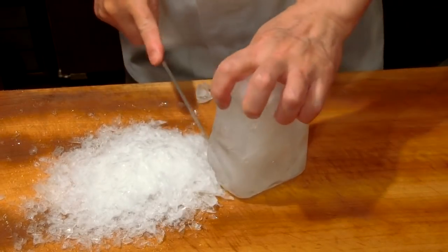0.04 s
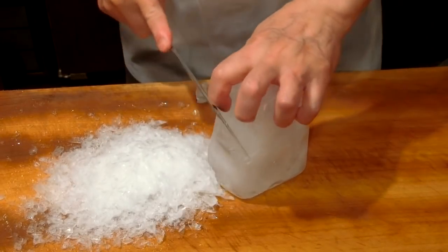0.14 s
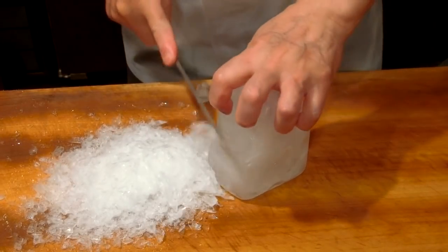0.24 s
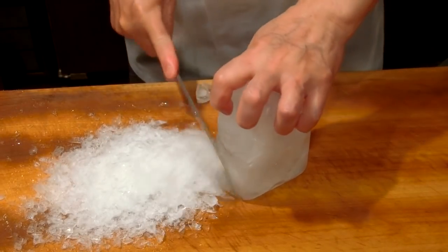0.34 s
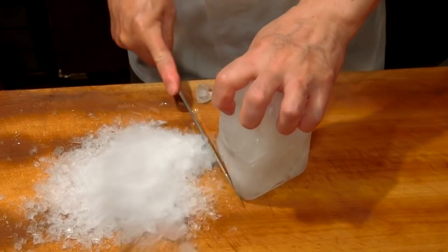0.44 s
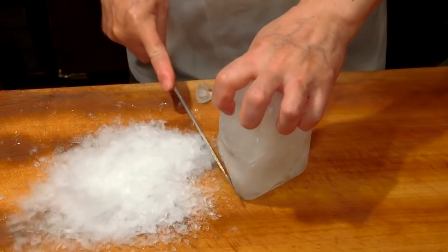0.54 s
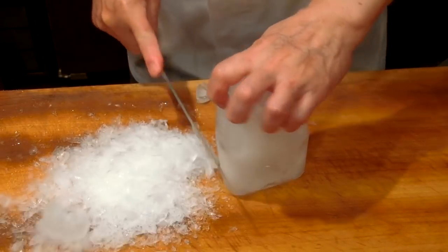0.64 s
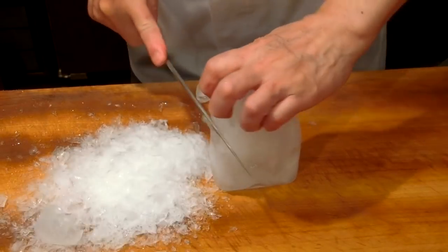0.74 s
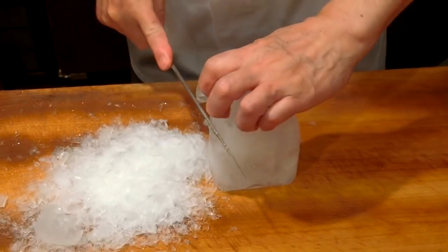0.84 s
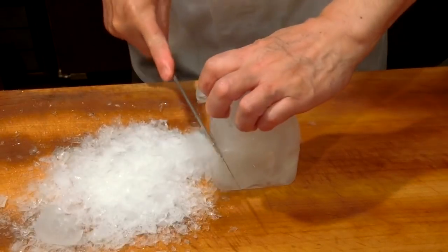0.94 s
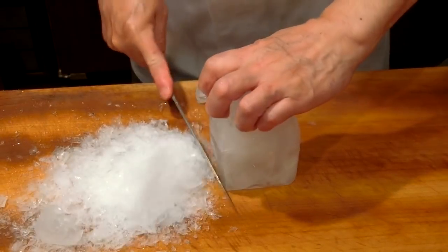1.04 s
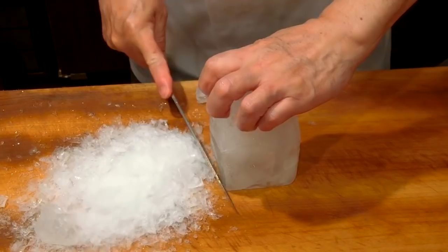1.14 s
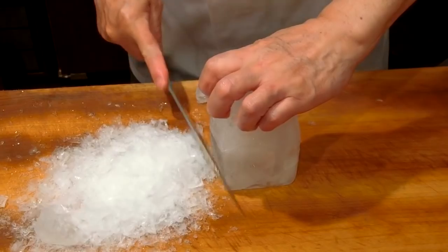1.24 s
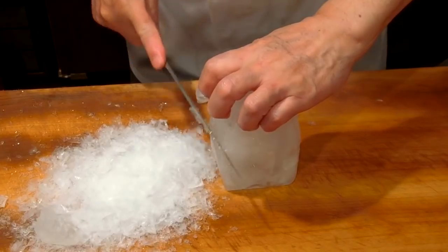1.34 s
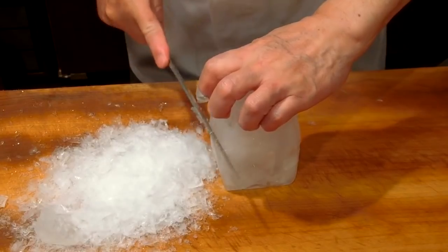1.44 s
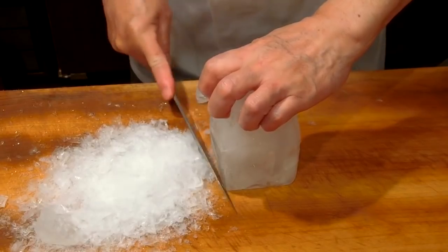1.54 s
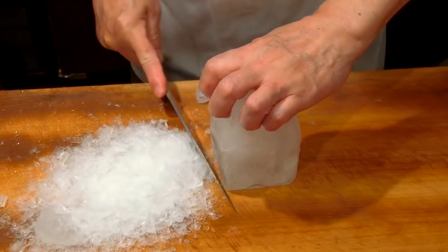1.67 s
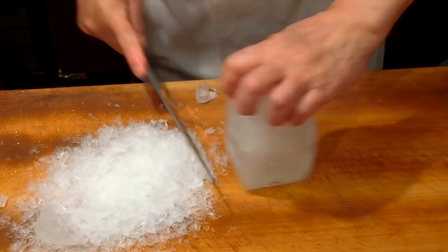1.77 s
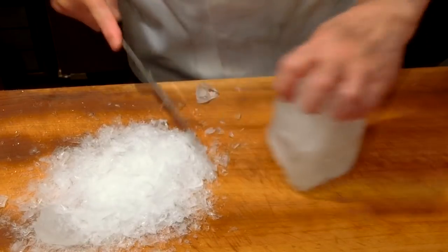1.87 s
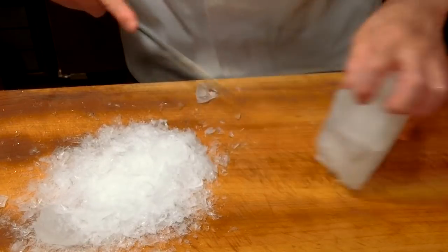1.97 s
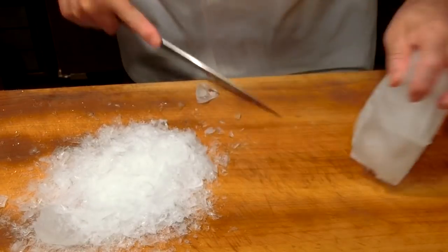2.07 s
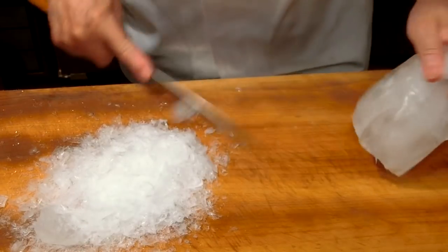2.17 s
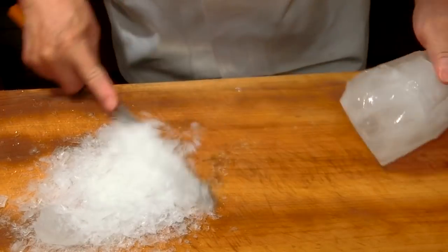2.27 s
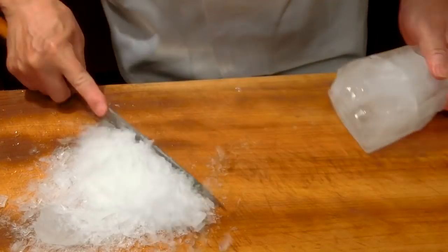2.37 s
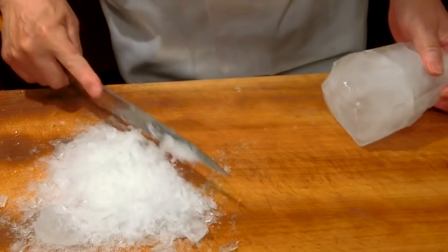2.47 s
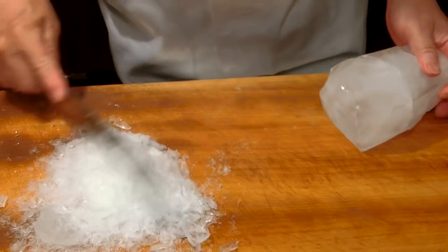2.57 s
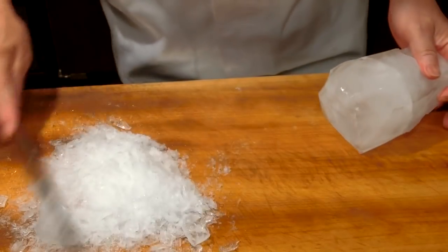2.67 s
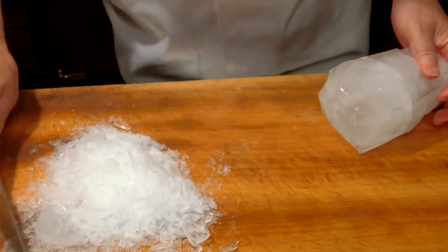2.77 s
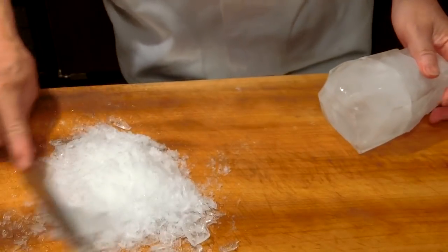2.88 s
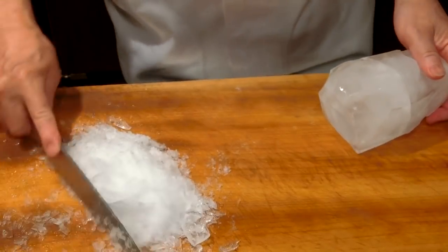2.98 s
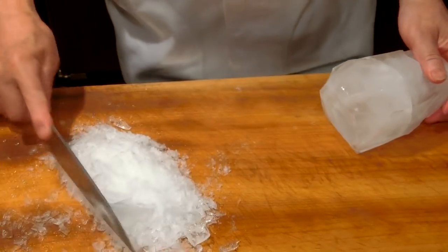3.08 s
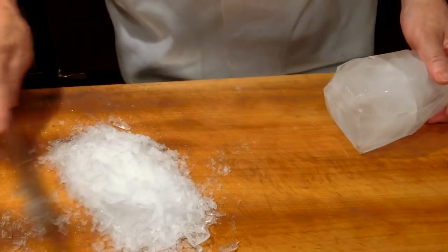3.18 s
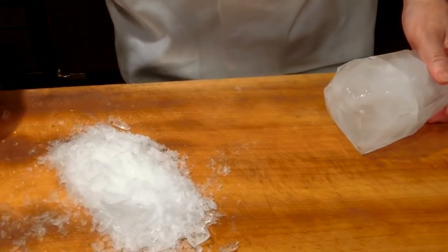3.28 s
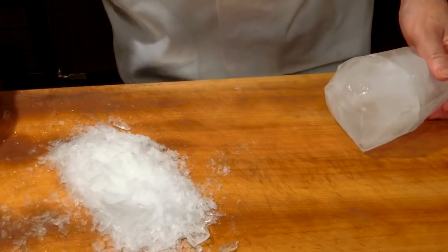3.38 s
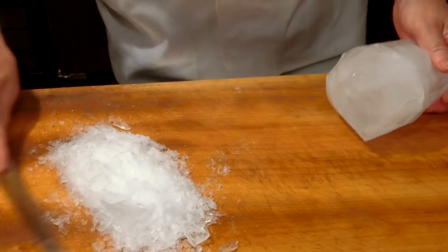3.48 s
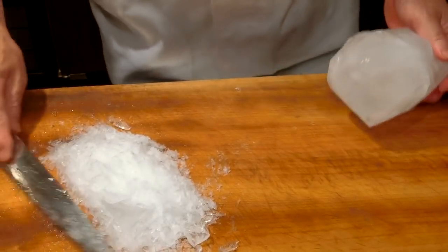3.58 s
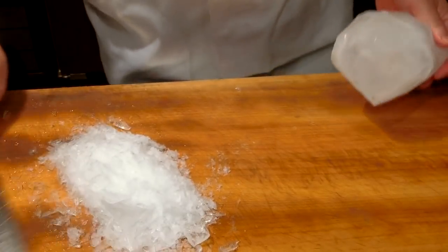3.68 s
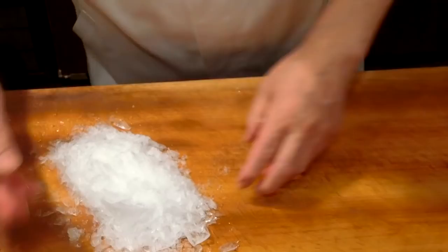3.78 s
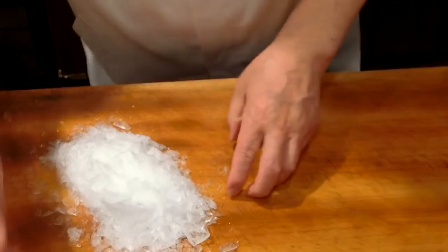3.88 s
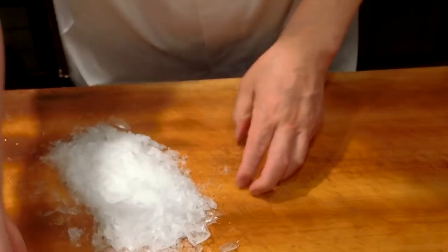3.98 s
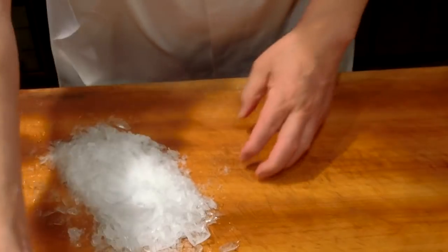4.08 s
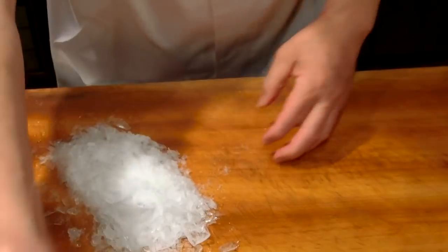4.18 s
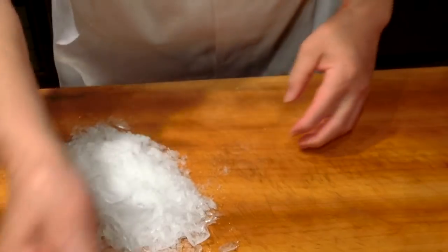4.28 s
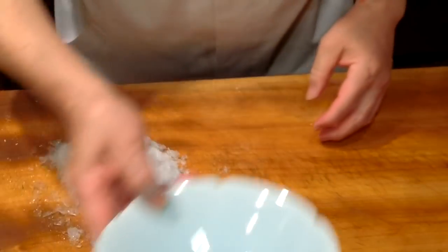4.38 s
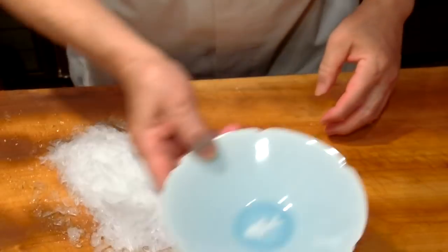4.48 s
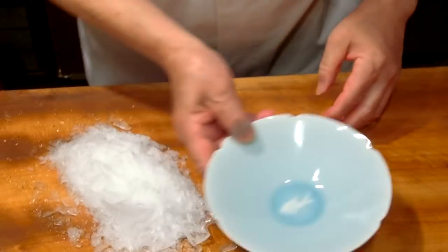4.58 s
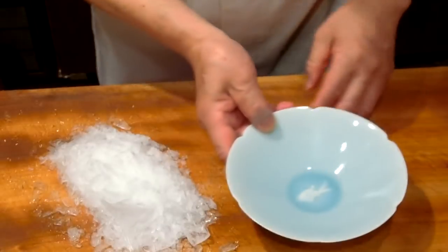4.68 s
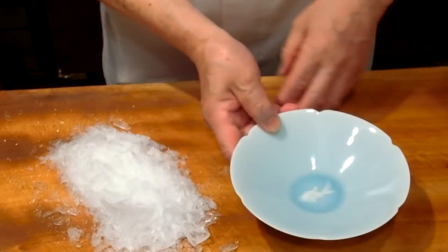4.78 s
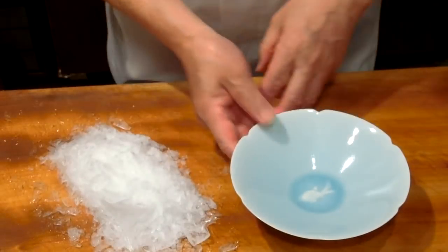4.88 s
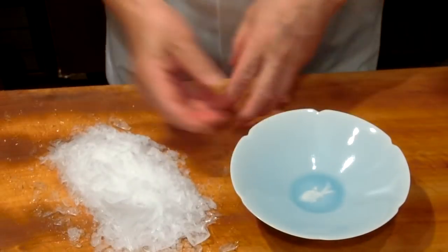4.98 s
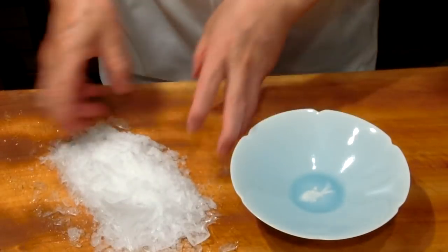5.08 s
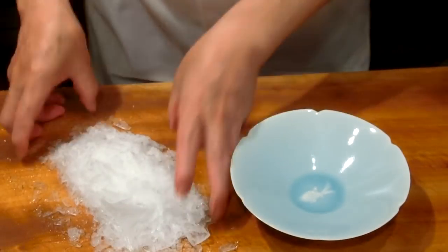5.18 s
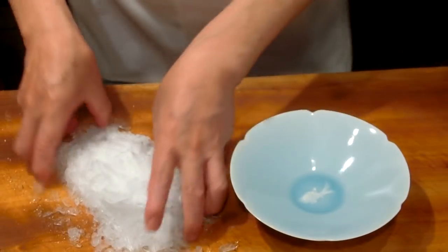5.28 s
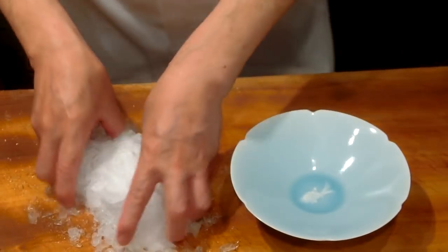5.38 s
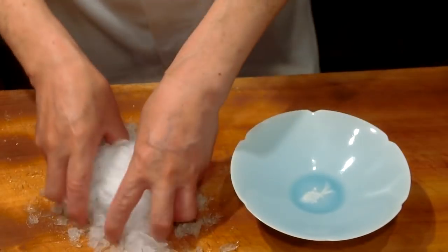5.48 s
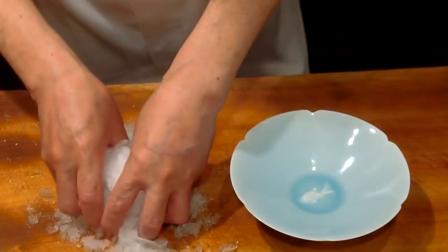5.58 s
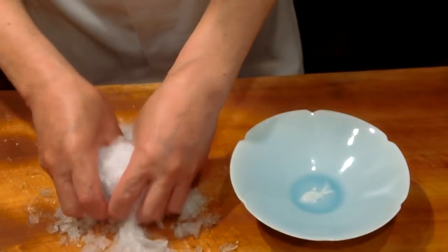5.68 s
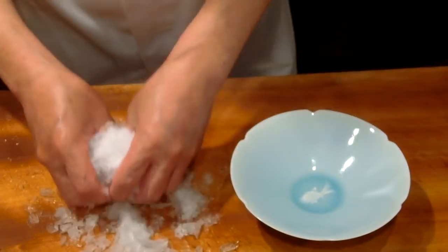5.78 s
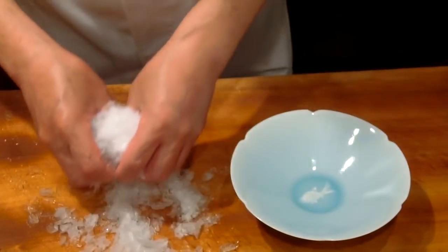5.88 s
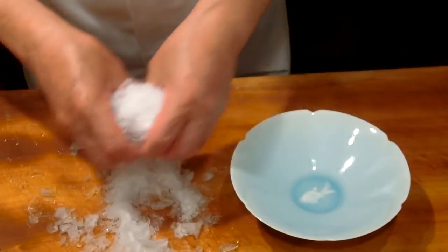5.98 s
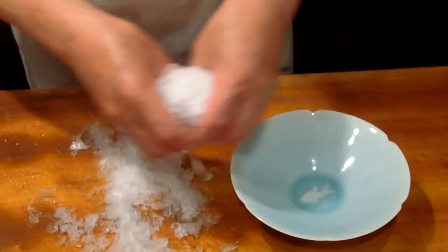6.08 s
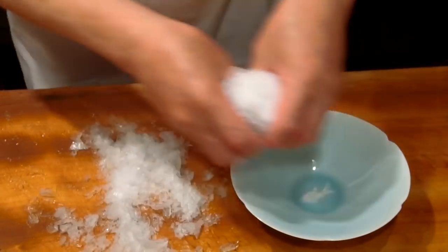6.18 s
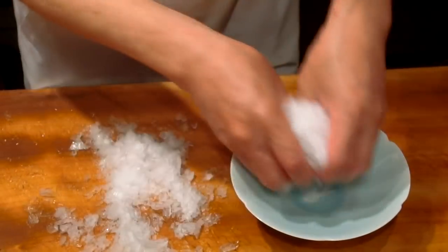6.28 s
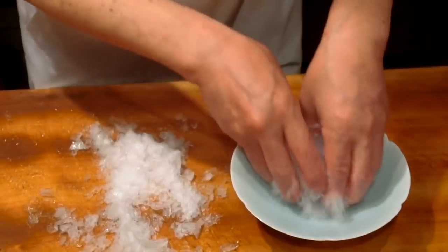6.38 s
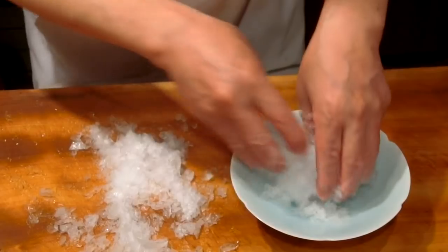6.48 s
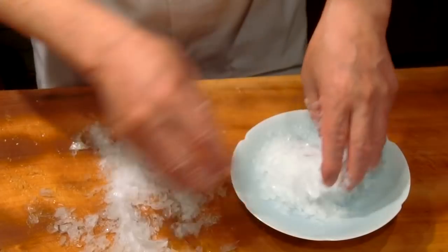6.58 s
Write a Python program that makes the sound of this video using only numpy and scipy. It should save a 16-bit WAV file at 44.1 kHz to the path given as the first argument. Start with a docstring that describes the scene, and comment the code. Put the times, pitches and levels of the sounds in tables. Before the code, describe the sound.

Three quick crunches of shaved ice, crisp and high, stop against a thick wooden board. The steel edge then clicks and rasps as it pushes loose flakes into a heap. Skin brushes quietly, a dish is set down with a strong wooden thud and slight porcelain tick, and loose ice is gathered with soft, slushy rustling, ending in a small ringing clink. Heard close in a small room, with low steady fan air underneath.

```python
"""In a small kitchen, heard from close by, a long knife shaves a block of ice in three quick strokes,
each ending on a thick wooden board. The block is put aside, the blade sweeps the shavings into a heap,
a porcelain dish is set down, and two hands scoop up the ice and drop it in while a fan hums.
Ice is built from showers of tiny random clicks; steel, wood and porcelain from fading tones;
the fan from coloured noise and a few wavering tones."""
import sys
import numpy as np
from scipy import signal
from scipy.fft import rfft, irfft
from scipy.io import wavfile
from scipy.ndimage import uniform_filter1d

SR = 44100
rng = np.random.default_rng(int(sys.argv[2]) if len(sys.argv) > 2 else 0)


def to_wav(s):
    """Save 16-bit WAV."""
    ch = np.atleast_2d(s).T  # columns
    pcm = np.round(np.clip(ch, -1, 1) * 32767)  # PCM
    wavfile.write(sys.argv[1], SR, pcm.astype(np.int16))


N = 292381
TIME = np.arange(N) / SR
RING_TIME = TIME[:SR // 2]  # half a second, for blows and responses

# crisp sound of ice being cut: (frequency [Hz], level [dB])
CUT_COLOUR = [(2060, -22), (3500, -10.5), (5360, -4), (5530, -7.5), (6440, -4.5), (6780, -8.5), (7320, -7),
              (9440, -8.5), (10300, -6), (11100, -4.5), (13600, 3), (15100, 1), (16000, -32.5)]
# wetter crunch of loose shavings: (frequency [Hz], level [dB])
SLUSH_COLOUR = [(590, -14.5), (1000, -12.5), (1370, -11), (1450, -10), (1910, -10), (2180, -7.5),
                (2440, -6), (5310, -9), (7880, -11.5), (13900, -1), (15100, -4), (16000, -0.5)]


def shaving_strokes(cut_db=-1, body_db=-1, steel_db=-6, catch_db=1.5):
    """The edge catches and slips, breaking off flakes; block and blade sound too, most at the board."""
    # pushes of the edge down the block, force building until the ice gives way:
    # (time it gives [s], level [dB], build-up [s], body of block and blade relative to it [dB])
    push_table = [(0.229, -30, 0.059, -17.5), (0.254, -28.5, 0.079, -12.5), (.318, -21, 0.062, -10.5),
                  (0.354, -20, 0.067, -16), (0.932, -22.5, 0.094, -8), (0.971, -12.5, 0.017, -14.5),
                  (0.993, -19.5, 0.05, -11), (1.492, -26.5, 0.064, -11)]
    push_hold_s, push_release_s = 0.0058, 0.036
    # the edge crushing flakes against the board at the foot of a stroke: (time [s], level [dB])
    crush_table = [(0.359, -19.5), (1, -27.5), (1.5, -25)]
    crush_rise_s, crush_release_s = 0.013, 0.047
    # duller sound of the whole block: (frequency [Hz], level [dB])
    block_colour = [(60, -28), (110, -11), (200, -6.5), (350, 5.5), (650, -6), (1100, 0.5), (1600, -6.5),
                    (2800, 3), (3600, -2), (5500, -25)]

    fractures = flake_sizes(stick_slip(catch_db) * grains(per_s=3500, spread_db=2.0))
    pushes = [move(s, db, build_s, push_hold_s, push_release_s) for s, db, build_s, _ in push_table]
    crushes = [move(s, db, crush_rise_s, 0, crush_release_s) for s, db in crush_table]
    cutting = np.max(pushes, axis=0) * fractures
    out = undb(cut_db) * through(cutting, colour(CUT_COLOUR))

    body_pushes = [undb(row[-1]) * push for row, push in zip(push_table, pushes)]
    block = undb(body_db) * colour(block_colour)
    for force in body_pushes + crushes:
        body = undb(steel_db) * blade(hold=0.32, rub_db=-29)
        body[:len(block)] += block
        out = out + through(force * fractures, body)
    return out


def blade_sweeps(hiss_db=-1, steel_db=1, drag_db=-18, drag_hz=335, catch_db=0.5):
    """The edge rubs over wet wood, ringing steel and dragging the board; shavings hiss ahead of it."""
    # the blade pushing shavings over the board:
    # (time at full speed [s], ice hiss level [dB], steel ring level [dB], rise [s], hold [s], release [s])
    sweeps = [(2.161, -36.5, -32, .15, 0.035, 0.39), (2.825, -33.5, -39, 0.011, 0.088, 0.16),
              (3.337, -36, -33, 0.022, 0.14, 0.18), (3.771, -44, -44, 0.08, .078, 0.0054)]
    sag_db_per_s = 73  # shavings pile up on the blade and damp it

    catch, out = stick_slip(catch_db), 0
    flakes = flake_sizes(catch * grains(per_s=2500, spread_db=4.0))
    rub = flake_sizes(catch * grains(per_s=1400, spread_db=3.0))
    for s, ice_db, ring_db, rise_s, hold_s, release_s in sweeps:
        speed = move(s, 0, rise_s, hold_s, release_s)
        hiss = undb(hiss_db + ice_db) * through(speed * flakes, colour(SLUSH_COLOUR))
        ring_gain = undb(ring_db - sag_db_per_s * np.maximum(TIME - s, 0))
        steel = undb(steel_db) * blade(hold=0.59, rub_db=-2.5, place_db=3, shift=0.0128)
        dragged_board = undb(drag_db) * ring([(drag_hz, 0, .05)])
        out = out + hiss + through(speed * ring_gain * rub, steel + dragged_board)
    return out


def blade_taps(flat_hz=7000):
    """The blade lands on ice or wood and chatters briefly, which makes its steel ring."""
    # the blade meeting ice or wood:
    # (time [s], level [dB], chatter fade time, at least 0.0003 [s], treble lean [dB per octave])
    taps = [(0.032, -46, 0.045, 7.5), (0.096, -45.5, 0.025, 2), (0.767, -45.5, 0.0055, 0),
            (.812, -41.5, 0.03, 1.5), (1.222, -49, 0.012, 3), (1.28, -61, 0.0022, 9.5),
            (1.333, -46, 0.006, -0.5), (1.345, -33.5, 0.025, 4), (1.658, -45.5, 0.0063, 3.5),
            (1.671, -44, 0.0043, -5), (1.835, -57.5, .01, 12), (1.881, -46.5, 0.011, 5.5),
            (2.034, -35, 0.011, -5), (2.743, -31, 0.0065, -1), (2.827, -28, 0.0068, -1),
            (3.278, -45.5, .002, -2.5), (3.332, -23, 0.014, -3.5), (3.472, -30, 0.0085, 13),
            (3.72, -18, 0.005, 3), (3.777, -36, 0.0081, 10)]
    out = np.zeros(N)
    for s, db, seconds, lean in taps:
        # the lean stops at flat_hz
        hardness = colour([(125, 0), (flat_hz, lean * np.log2(flat_hz / 125))])
        steel = blade(hold=1.0, rub_db=1.5, place_db=7.5)
        chatter = through(burst(seconds, per_s=3000), steel)
        add(out, s, through(chatter, hardness), db)
    return out


def blade(hold, rub_db, place_db=3, shift=0.03):
    """Steel tones over the broad sound of contact; each new touching point reweights and bends them."""
    # tones of the knife blade: (frequency [Hz], level [dB], free time to fade by 60 dB [s])
    blade_modes = [(1356, 2, 0.028), (1630, 4, 0.072), (1795, -9, 0.12), (2120, -12, .07),
                   (2474, -4.5, 0.14), (2700, -19, 0.043), (2854, -14.5, 0.14), (3360, -1, 0.038),
                   (3426, 4.5, 0.07), (4070, 4, 0.08), (4750, 4.5, 0.039), (5480, -4.5, 0.1),
                   (6300, -16, .03), (7020, 3, 0.061), (7430, 0, 0.027), (8380, -0.5, 0.14),
                   (10390, 4, 0.033), (11900, -4, 0.14), (12150, 8.5, 0.014), (13400, 22, 0.014)]
    # steel rubbing: (frequency [Hz], level [dB])
    rub_colour = [(50, -42), (120, -17), (330, -3), (600, 7.5), (1000, 0.5), (1700, 3), (2600, 12.5),
                  (4000, 8.5), (7000, 2.5), (15000, 6.5)]
    chance = rng.standard_normal((len(blade_modes), 2))
    modes = [(hz * (1 + shift * bend), db + place_db * weight, t60)
             for (hz, db, t60), (bend, weight) in zip(blade_modes, chance)]
    response = ring(modes, hold)
    rub = colour(rub_colour)
    response[:len(rub)] += undb(rub_db) * rub
    return unit(response)


def ice_cracks():
    """Larger chips snap off and crumble into a dying run of smaller fractures."""
    # ice cracking or crunching: (time [s], level [dB], crumble fade time, at least 0.0003 [s])
    cracks = [(0.144, -46.5, .003), (0.254, -21, 0.0056), (.277, -26, 0.0046), (0.343, -19, 0.016),
              (.509, -38, 0.0037), (.575, -37.5, 0.0039), (0.647, -44, 0.0068), (.811, -38, 0.0022),
              (0.897, -30, 0.0035), (.925, -18, 0.014), (1.463, -34, 0.0072), (1.479, -21.5, 0.022),
              (2.182, -22.5, 0.0012), (2.744, -23, 0.0067), (2.902, -33, .01), (3.722, -21, 0.0051),
              (3.8, -27.5, .004), (3.82, -38.5, 0.0017), (4.102, -52, .003), (5.249, -38.5, .004),
              (5.307, -41, 0.0034), (5.92, -43.5, 0.002), (6.012, -42.5, 0.0012), (6.101, -42.5, 0.002),
              (6.347, -39.5, 0.0066), (6.365, -22, 0.005), (6.505, -37.5, 0.004)]
    out, ice = np.zeros(N), colour(SLUSH_COLOUR) + colour(CUT_COLOUR)
    for s, db, seconds in cracks:
        add(out, s, through(burst(seconds, per_s=4800), ice), db)
    return out


def ice_pops(t60=0.005, snap_db=-3):
    """Each air pocket opens with a snap and a very short, high ping."""
    # air pockets in the melting ice popping: (time [s], level [dB], pitch [Hz])
    pops = [(0.528, -33, 13300), (1.077, -37, 14300), (1.282, -49, 14100), (2.331, -41, 13700),
            (3.099, -46, 14300), (3.238, -48.5, 14100), (5.942, -49, 15100)]
    out = np.zeros(N)
    for s, db, hz in pops:
        ping = ring([(hz, 0, t60)])
        ping[0] += undb(snap_db) / 2
        add(out, s, ping, db)
    return out


def loose_ice(crunch_db=0, brush_db=0, slip_db=5.0):
    """Soft, uneven crunch of flakes sliding over each other, and the brush of wet hands."""
    # loose shavings settling after a stroke, or gathered by hand:
    # (time [s], level [dB], rise [s], hold [s], release [s])
    shavings = [(0.501, -42, .12, 0.084, 0.28), (1.116, -47.5, 0.074, 0.012, 0.17),
                (2.397, -47, 0.12, .01, 0.2), (3.002, -55, .1, .02, 0.22), (5.088, -55, 0.17, .14, .1),
                (5.306, -41, 0.15, 0.26, 0.19), (5.675, -42.5, .15, .02, 0.56),
                (5.94, -64.5, 0.18, 0.04, 0.25), (6.11, -58.5, 0.22, .02, 0.97),
                (6.38, -35.5, 0.11, .015, 0.23), (6.51, -46, .05, .01, 0.53)]
    # hands and sleeves brushing past: (time [s], level [dB], rise [s], hold [s], release [s])
    brushes = [(3.167, -67, 0.27, 0.049, 0.17), (3.628, -60, 0.34, 0.025, 0.18),
               (3.873, -60, .08, .02, 0.3), (4.198, -61, 0.042, 0.0118, .06),
               (4.292, -56, 0.024, 0.027, 0.1), (4.416, -61.5, 0.042, 0.0087, .12),
               (4.941, -49, 0.13, 0.0046, 0.1), (5.146, -57.5, 0.034, 0.024, 0.39),
               (5.675, -54, .12, 0.048, 0.32)]
    # soft rubbing of skin: (frequency [Hz], level [dB])
    skin_colour = [(500, -19), (2000, 3), (3000, 4.5), (5000, -4.5), (15000, -15)]
    flakes = flake_sizes(grains(per_s=3000, spread_db=2.0), scatter_db=1.5)
    crunch = np.max([move(*row) for row in shavings], axis=0) * flakes
    brush = sum(move(*row) for row in brushes) * stick_slip(slip_db, count=600) * rng.standard_normal(N)
    crunch = undb(crunch_db) * through(crunch, colour(SLUSH_COLOUR))
    return crunch + undb(brush_db) * through(brush, colour(skin_colour))


def board_knocks(thud_db=1, rattle_db=-1, rattle_t60=0.16):
    """Each blow rings the board and the counter beneath; a longer contact sounds duller."""
    # blows on the board: (time [s], level [dB], contact time [ms], treble lean [dB per octave])
    knocks = [(.355, -19, 0.75, 8), (.363, -23.5, 0.46, 0.5), (0.998, -27, 0.65, 1.5),
              (1.498, -27.5, 1.07, 2), (1.768, -49.5, 0.84, -4.5), (1.79, -43.5, 2.2, 4.5),
              (2.033, -32, 1.24, 3.5), (2.358, -46, 1.3, 5.5), (2.744, -45, 0.46, -3),
              (2.828, -36.5, 0.26, 4), (3.332, -38, 0.19, 5.5), (3.72, -38.5, 0.2, 0),
              (4.19, -46.5, 0.88, -1), (4.623, -11.5, 0.98, 6), (4.725, -16, 0.88, 5.5),
              (4.751, -21.5, 0.82, 3), (4.798, -30, 0.48, 4), (5.161, -42.5, 0.62, 0.5),
              (5.174, -45, 1.5, 11), (5.208, -43.5, 1.13, 5.5), (5.734, -43, 0.96, 3.5)]
    # tones of the wooden board: (frequency [Hz], level [dB], time to fade by 60 dB [s])
    board_modes = [(121.5, -1.5, 0.14), (239.5, 5.5, 0.11), (297, 3.5, 0.094), (349, 11, 0.12),
                   (450, -20, 0.16), (520, 2, 0.23), (642, -3.5, 0.16), (700, -11, 0.15), (786, -4, 0.21),
                   (919, 14, 0.028), (1034, 3, 0.11), (1127, 2.5, 0.11), (1220, -10.5, 0.087),
                   (1450, -11, 0.089), (1720, -19, 0.1), (2190, -17.5, 0.13)]
    # wooden counter: (frequency [Hz], level [dB])
    wood_colour = [(50, -57), (90, -10.5), (140, 1), (280, -4), (700, 4), (1200, 6.5), (1550, 4.5),
                   (2500, -3), (3300, -18.5), (8000, -51.5)]
    out, wood = np.zeros(N), colour(wood_colour)
    modes = ring(board_modes)
    for s, db, contact_ms, lean in knocks:
        counter = undb(rattle_db) * unit(rng.standard_normal(len(RING_TIME)) * fade(rattle_t60))
        counter[0] += undb(thud_db)
        # an elastic contact pushes with half a sine
        push = np.sin(np.pi * np.minimum(RING_TIME * 1000 / contact_ms, 1))
        struck = through(modes + through(counter, wood), tilt(lean))
        add(out, s, through(struck, push), db)
    return out


def dish_clinks(click_s=0.0026):
    """Porcelain ticks at each touch; its ring is cut short while held, nearly free as ice drops in."""
    # the dish struck: (time [s], ring level [dB], click level [dB],
    # share of its free ring time [0-1], lean towards the high tones [dB per octave])
    clinks = [(4.48, -62, -35.5, 0.01, -4), (4.624, -32, -34.5, 0.33, 13), (4.801, -48, -35.5, 0.02, 11),
              (6.37, -27.5, -18.5, 0.92, 1), (6.481, -63, -41.5, 0.4, 2)]
    # tones of the porcelain dish: (frequency [Hz], level [dB], free time to fade by 60 dB [s])
    dish_modes = [(1217, -9, 0.5), (2300, 2.5, 0.38), (2335, 1, 0.47), (2920, 1, 0.064), (3653, -9, 0.55),
                  (5440, -17, 0.65), (7300, -13, 0.52), (7800, -4, 0.28), (8215, 2, 0.13),
                  (10400, -11.5, 0.32), (12260, 1, 0.37)]
    # tick of the touch: (frequency [Hz], level [dB])
    click_colour = [(60, -48), (200, -1), (900, -4.5), (1400, 10.5), (3000, 5), (6000, 0), (10000, -4),
                    (15000, -22)]
    rings, clicks = np.zeros(N), np.zeros(N)
    for s, ring_db, click_db, hold, lean in clinks:
        modes = [(hz, db + lean * np.log2(hz), t60) for hz, db, t60 in dish_modes]
        add(rings, s, ring(modes, hold), ring_db)
        add(clicks, s, through(burst(click_s, per_s=2200), colour(click_colour)), click_db)
    # the dish's ring is kept nearly dry, its clicks get more of the room
    nearly_dry = kitchen(rings, wet_db=-13)
    return nearly_dry + kitchen(clicks, wet_db=-1.5)


def fan(air_db=-1, hum_db=-1, waver_hz=1.49):
    """Rushing air as coloured noise, and a few motor tones whose pitch wavers."""
    # rushing air: (frequency [Hz], level [dB])
    air_colour = [(15, -51), (25, -23), (102, -15), (153, -8.5), (223, -12), (249, -2.5), (317, -14.5),
                  (344, -5.5), (575, -8.5), (754, -7), (887, -13.5), (1890, -18), (5430, -27.5),
                  (14400, -30.5), (16000, -30)]
    # fan and motor tones, lowest first: (frequency [Hz], level at the end before hum_db [dB])
    motor_tones = [(253.0, -65.5), (511.4, -65), (672.9, -67), (705.2, -74), (764.4, -60)]
    # background level, lower at first: (time [s], level [dB])
    background_level = [(0, -61), (.7, -58.5), (1.3, -60), (1.9, -57), (2.6, -54.5), (3.9, -54),
                        (4.5, -52.5), (6.6, -53)]
    # the lowest motor tone swells and sinks again near the end: (time [s], level [dB])
    low_tone_swell = [(5.4, -2.5), (5.9, 8), (6.6, -3)]
    level = undb(np.interp(TIME, *np.transpose(background_level)))
    air = stereo(*(through(rng.standard_normal(N), colour(air_colour)) for _ in range(2)))
    knots, tones = np.linspace(0, TIME[-1], num=40), []
    for hz, db in motor_tones:
        pitch = hz + waver_hz * np.interp(TIME, knots, rng.standard_normal(len(knots)))
        phase = 2 * np.pi * np.cumsum(pitch) / SR
        tones.append(undb(db + hum_db) * np.sqrt(2) * np.sin(phase))
    low_tone = tones[0] * undb(np.interp(TIME, *np.transpose(low_tone_swell)))
    hum = low_tone + sum(tones[1:])
    return level * (undb(air_db) * air + hum / level[-1])


def kitchen(x, wet_db, first_echo_s=0.0011, room_t60=0.21):
    """Direct sound and a short dense wash from counter and walls, scaled to keep the power about equal."""
    envelope = fade(room_t60) * np.clip(RING_TIME / first_echo_s - 1, 0, 1)
    walls = stereo(*(unit(rng.standard_normal(len(envelope)) * envelope) for _ in range(2)))
    wet = undb(wet_db)
    reflected = np.array([through(x, wall) for wall in walls])
    return (x + wet * reflected) / np.sqrt(1 + wet ** 2)


def stereo(mid, side):
    """Two close microphones: alike in most of the bass, almost unrelated in the treble."""
    # width of air and reflected sound: (frequency [Hz], side relative to mid [dB])
    width = [(30, 9), (70, -17), (130, -10), (300, -17), (1000, -7.5), (2500, -8.5), (4200, 0), (9000, 3.5),
             (14000, -1)]
    hz, db = np.transpose(width)
    bins = np.linspace(1, SR / 2, len(side) // 2 + 1)
    side_gain = undb(np.interp(np.log(bins), np.log(hz), db))
    side = irfft(rfft(side) * side_gain, len(side))
    return np.array([mid + side, mid - side])


def from_left(pair, count, left_db=0.96):
    """A source to the left is a little louder there; the right microphone lags by count samples."""
    right = np.roll(pair[1], count)
    return np.array([pair[0] * undb(left_db / 2), right * undb(-left_db / 2)])


def move(s, db, rise_s, hold_s, release_s, rise_power=2.2, drop_db=30):
    """Gain of one movement: it swells up to time s, holds, then falls by drop_db per release time."""
    force = np.clip(1 + (TIME - s) / max(rise_s, .002), 0, 1)
    released = np.clip((TIME - s - hold_s) / max(release_s, .002), 0, 10)
    # sound grows as a power of the steadily growing force
    return force ** rise_power * undb(db - drop_db * released)


def stick_slip(depth_db, count=1400):
    """Gain of an edge that catches and lets go every few milliseconds, at count random levels."""
    knots = np.linspace(0, TIME[-1], count)
    return undb(depth_db * np.interp(TIME, knots, rng.standard_normal(count)))


def flake_sizes(x, scatter_db=3.0, order=2):
    """Flakes of changing size shift the weight between coarse, middle and fine crunch."""
    filters = [signal.butter(order, hz, fs=SR, output="sos") for hz in (3000, 8000)]
    coarse, up_to_middle = (signal.sosfiltfilt(lowpass, x) for lowpass in filters)
    bands = coarse, up_to_middle - coarse, x - up_to_middle
    return sum(band * stick_slip(scatter_db, count=600) for band in bands)


def grains(per_s, spread_db, count=N):
    """Tiny fractures at random moments with widely scattered sizes, average power 1."""
    happens = rng.random(count) < per_s / SR
    sign = rng.choice([-1, 1], count)
    x = happens * sign * undb(spread_db * np.minimum(rng.standard_normal(count), 2.5))
    return x / np.sqrt(np.mean(x ** 2))


def burst(seconds, per_s):
    """One snap and a run of smaller fractures that dies away."""
    x = grains(per_s, spread_db=3.0, count=len(RING_TIME)) * np.exp(-RING_TIME / max(seconds, .0003))
    x[0] += 4
    return x


def ring(modes, hold=1):
    """Fading tones of alternating sign; a hand on the object (hold below 1) shortens them."""
    tones = [(-1) ** k * undb(db) * fade(t60 * hold) * np.cos(2 * np.pi * hz * RING_TIME)
             for k, (hz, db, t60) in enumerate(modes)]
    return unit(sum(tones))


def fade(t60):
    """Exponential decay by 60 dB in t60 seconds."""
    return np.exp(-np.log(1000) * RING_TIME / t60)


def add(track, s, sound, db, size=200):
    """Mix in a blow so that its loudest few milliseconds (size samples) have the given level."""
    start = int(s * SR)
    sound = sound[:N - start]
    loudest = np.sqrt(uniform_filter1d(sound ** 2, size, mode="constant").max())
    track[start:start + len(sound)] += sound * undb(db) / loudest


def colour(points, size=2048):
    """Response shaped like the given (frequency [Hz], level [dB]) curve, with no sound ahead of time."""
    hz, db = np.transpose(points)
    bins = np.arange(size // 2 + 1) * SR / size + 1  # 1 Hz up, to avoid log(0)
    log_gain = np.log(undb(np.interp(np.log(bins), np.log(hz), db)))
    # folding the cepstrum packs the energy towards the start
    cepstrum = irfft(log_gain)[:size // 2]
    cepstrum[0] /= 2
    return unit(irfft(np.exp(rfft(2 * cepstrum, size))))


def tilt(db_per_octave):
    """Response that leans evenly over the seven octaves above 125 Hz."""
    return colour([(125, 0), (16000, 7 * db_per_octave)])


def through(x, response):
    """Pass a sound through an impulse response."""
    return signal.fftconvolve(x, response)[:len(x)]


def unit(response):
    """Scale a response so that it keeps the power of white noise."""
    return response / np.sqrt(np.sum(response ** 2))


def undb(db):
    """Decibels to gain."""
    return 10 ** (np.asarray(db) / 20)


def scene():
    """Ice, steel and porcelain a little to the left; the board in the middle of the counter."""
    ice = kitchen(shaving_strokes() + loose_ice(), wet_db=-4.5)
    ice = ice + kitchen(ice_cracks() + ice_pops(), wet_db=0.5)
    steel = kitchen(blade_sweeps() + blade_taps(), wet_db=-5.5)
    dish = dish_clinks()
    board = kitchen(board_knocks(), wet_db=-14.5)
    left = from_left(ice, count=0) + from_left(steel, count=1) + from_left(dish, count=0)
    return left + board + fan()


def record(dry, top_hz=15900):
    """The recorder cuts everything above top_hz steeply."""
    return signal.sosfilt(signal.ellip(10, .2, 70, top_hz, fs=SR, output="sos"), dry)


dry = scene()
out = record(dry)
to_wav(out)
```